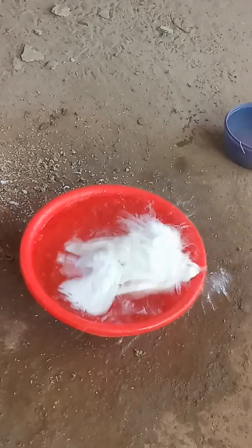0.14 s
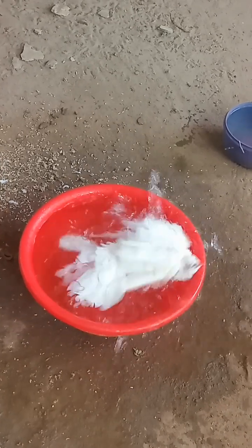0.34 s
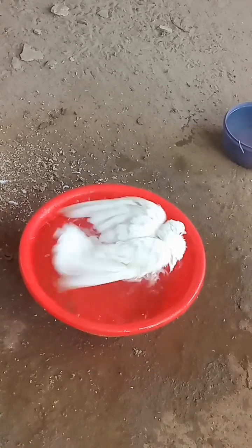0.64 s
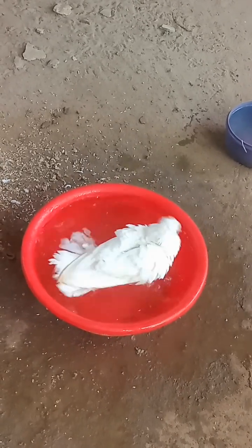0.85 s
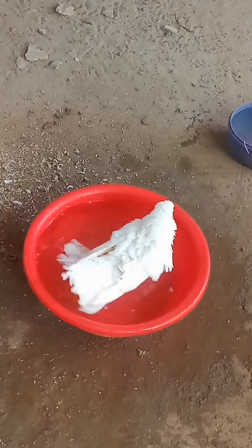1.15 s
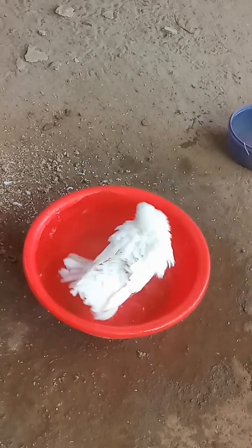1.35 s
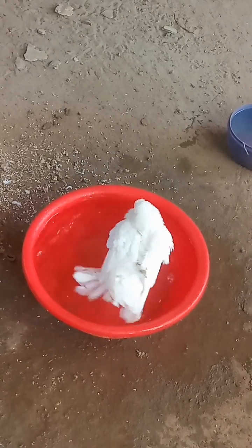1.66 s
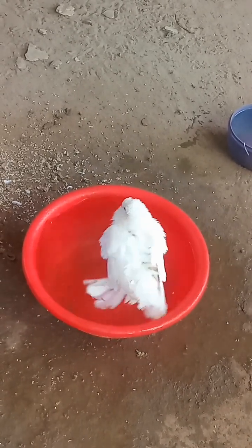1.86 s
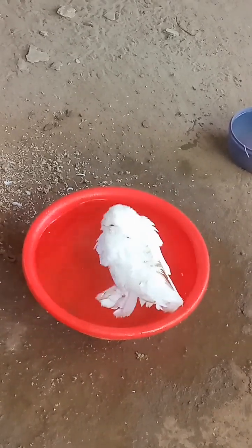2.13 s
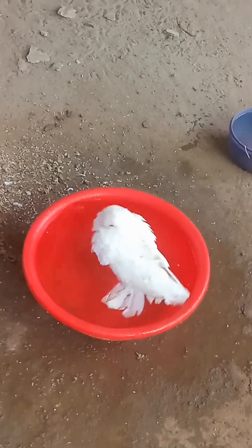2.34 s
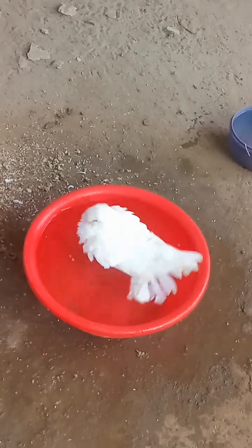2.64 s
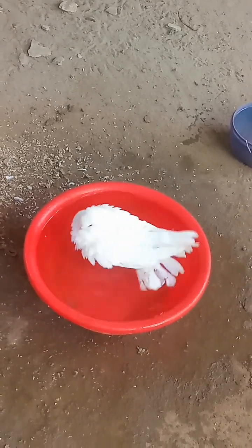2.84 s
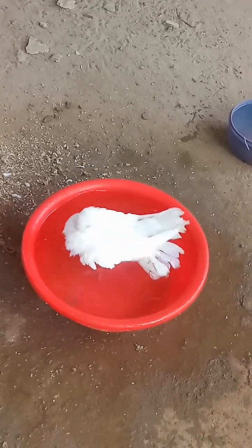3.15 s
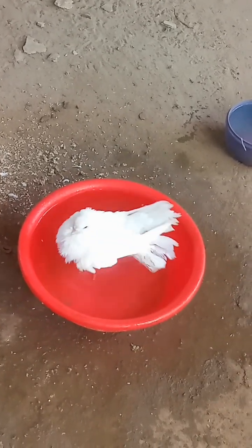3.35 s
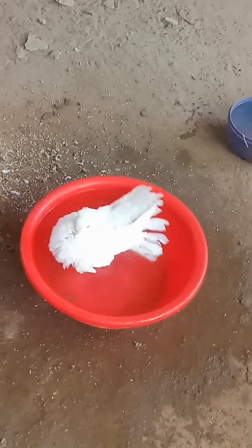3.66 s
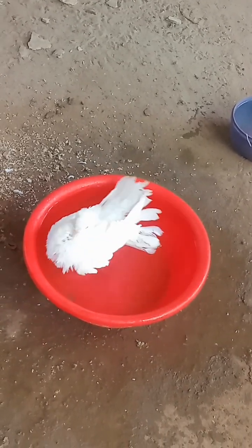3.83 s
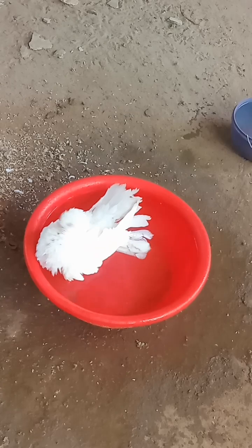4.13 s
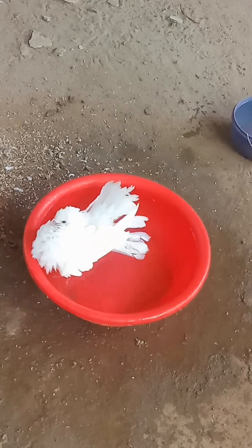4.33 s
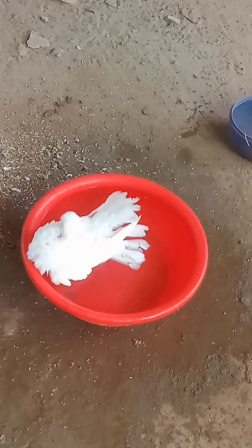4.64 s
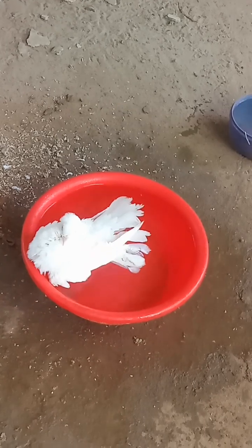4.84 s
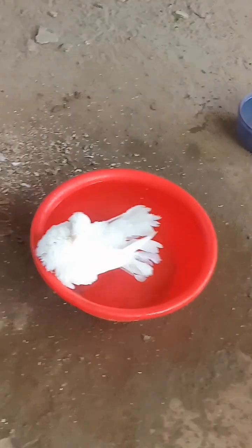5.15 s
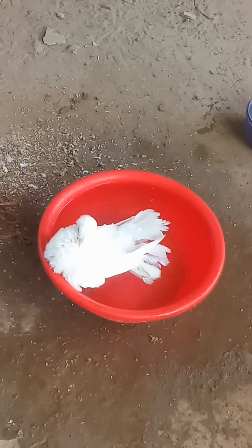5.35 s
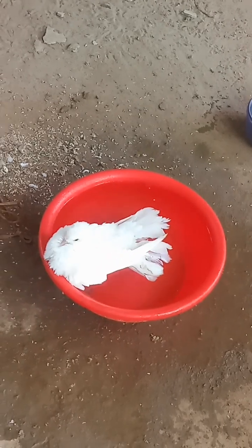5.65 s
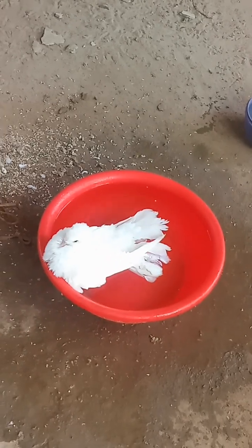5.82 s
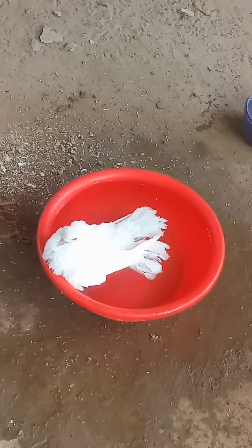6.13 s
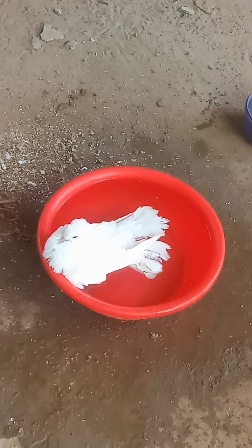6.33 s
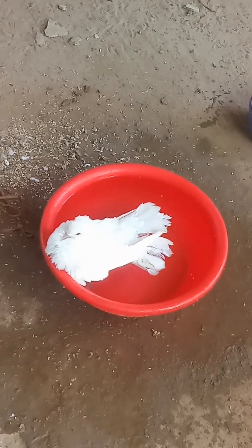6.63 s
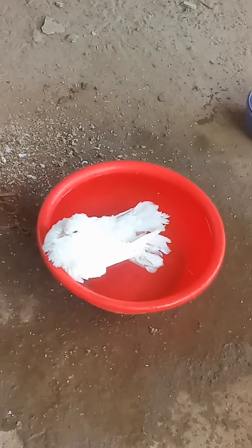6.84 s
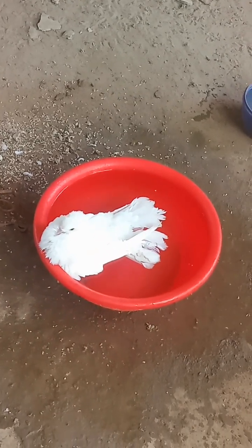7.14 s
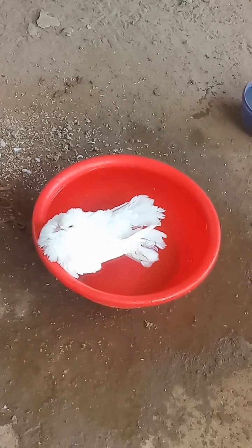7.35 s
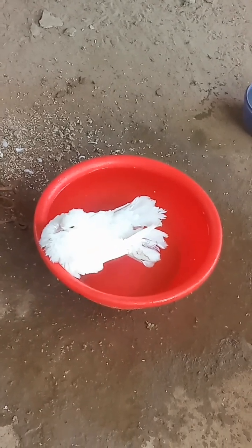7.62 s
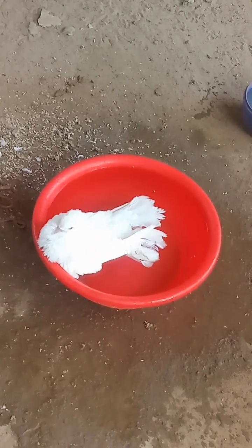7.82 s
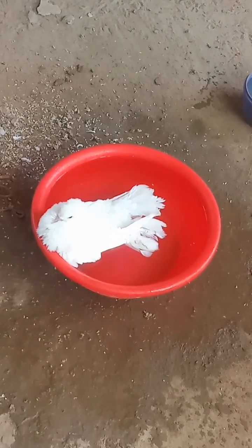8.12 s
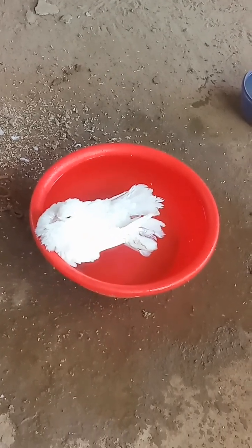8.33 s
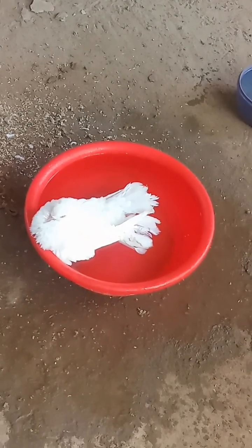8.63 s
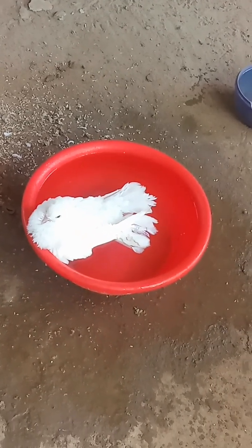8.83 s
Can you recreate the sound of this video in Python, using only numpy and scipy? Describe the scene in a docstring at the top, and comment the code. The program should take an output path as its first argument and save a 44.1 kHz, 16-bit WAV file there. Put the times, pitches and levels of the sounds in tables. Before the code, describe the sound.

A pigeon beats its wings in a shallow plastic basin right away: churning water, hollow plops and hissing spray, then drops pattering on concrete, all over in under a second. Young birds peep throughout in loud, overlapping falling whistles, some hoarse, ringing off the walls. Small feather rustles and dull basin bumps follow. Soft clucks come from further off, and a hoarse rooster crows near seven seconds. Handheld outdoor microphone, the basin close, quiet low background.

```python
"""Young birds peep without pause in falling whistles that ring between the walls of a concrete yard.
At once a pigeon thrashes its wings in a plastic basin: water churns, air pockets plop and spray hisses.
The thrown water patters down for under a second; a few drips, feather rustles and dull bumps follow.
From about the third second a bird clucks softly further off, and near the seventh a rooster crows.
Voices are tones or noise through resonances; water is shaped noise with many tiny ringing bubbles."""
import sys
import numpy as np
from scipy import signal
from scipy.fft import rfft, irfft, next_fast_len
from scipy.io import wavfile
from scipy.ndimage import map_coordinates

SR = 44100
rng = np.random.default_rng(int(sys.argv[2]) if len(sys.argv) > 2 else 0)


def persist_wave(psi):
    """Save psi, clipped to +-1, as 16-bit WAV."""
    counts = np.round(np.clip(psi, -1, 1) * 32767).astype(np.int16)
    wavfile.write(sys.argv[1], SR, np.atleast_2d(counts).T)


N = 396018  # length of the scene in samples, about 9 s


def amp(db):
    """Turn decibels into a gain."""
    return 10 ** (np.asarray(db) / 20)


def unit(x):
    """Scale a sound to an average (rms) level of 1."""
    return x / np.sqrt(np.mean(x ** 2) + 1e-20)


def along(points, hz):
    """Read a curve of (Hz, value) points at any pitch, on a log axis."""
    f, v = np.transpose(points)
    return np.interp(np.log(hz + 1), np.log(f + 1), v)


def gate(t, start, end, fade):
    """One between start and end, with soft edges."""
    inside = np.minimum(t - start, end - t) / fade + .5
    return np.sin(np.pi / 2 * np.clip(inside, 0, 1)) ** 2


def envelope(age, attack_s, hold_s, db_per_s):
    """Rise, hold, then die away at a steady number of decibels a second."""
    return gate(age, 0, np.inf, attack_s) * amp(-db_per_s * np.maximum(age - hold_s, 0))


def wobble(rate, size):
    """A smooth random curve with this many random knots a second."""
    knots = rng.standard_normal(int(size * rate / SR) + 4)
    return map_coordinates(knots, [np.arange(size) * rate / SR])


def filtered(x, response):
    """Multiply the spectrum of x by a function of frequency."""
    m = next_fast_len(len(x) + 8192)  # spare room keeps the end from wrapping onto the start
    return irfft(rfft(x, m) * response(np.fft.rfftfreq(m, 1 / SR)), m)[:len(x)]


def coloured(x, spectrum):
    """Shape x by (Hz, dB) points, at rms 1."""
    return unit(filtered(x, lambda hz: amp(along(spectrum, hz))))


def hump(x, centre_hz, octaves):
    """Pass x through one broad resonance, at rms 1."""
    return unit(filtered(x, lambda hz: np.exp(-.5 * (np.log2((hz + 1) / centre_hz) / octaves) ** 2)))


def grainy(size, clump_db):
    """Noise made of tiny contacts of uneven strength."""
    return rng.standard_normal(size) * amp(clump_db * wobble(700, size))


def add(track, s, sound):
    """Mix a sound into the track at time s, or at the very start if s is negative."""
    i = max(round(s * SR), 0)
    track[i:i + len(sound)] += sound[:max(N - i, 0)]


def bursts(rows, source):
    """Play source(t, ..) for each (start, length, dB, ..) row, unevenly loud; longer ones fade more slowly."""
    out, t = np.zeros(N), np.arange(SR // 2) / SR
    for s, length, db, *rest in rows:
        fade = .008 + 0.2 * length
        swell = gate(t, fade / 2, fade / 2 + length, fade)
        level = amp(db + 1.2 * wobble(55, len(t)))
        add(out, s - fade / 2, swell * level * source(t, *rest))
    return out


def yard(x, walls_db, tail_db):
    """The yard's answer: quick copies from floor and near walls, a few from far walls, then a lumpy tail."""
    # how long the yard rings at each pitch: pitch_hz, time_to_fall_60_db_s
    ring_times = [(300, 0.25), (2700, 0.29), (5000, 0.3), (12000, 0.11)]
    far_wall_db, far_wall_s = -10, .055  # far echoes against near ones, and their middle delay
    hz, t, z = signal.stft(rng.standard_normal(SR * 3 // 4), SR, nperseg=256)
    lumps = amp(3.5 * rng.standard_normal(len(t)))
    decay = amp(-60 * t / along(ring_times, hz)[:, None])
    tail = signal.istft(z * lumps * decay, SR, nperseg=256)[1]
    tail *= 1 - np.exp(-np.arange(len(tail)) / SR / .025)  # the tail builds up gradually

    near, far = np.zeros((2, len(tail)))
    near_delays_s = rng.uniform(.003, .028, size=12)
    near[(near_delays_s * SR).astype(int)] = rng.uniform(0.2, 1, size=12)
    far_delays_s = far_wall_s * rng.uniform(.55, 1.45, size=4)
    far[(far_delays_s * SR).astype(int)] = rng.uniform(.5, 1, size=4)

    paths = [(tail_db, tail), (walls_db, near), (walls_db + far_wall_db, far)]
    answer = sum(amp(db) * path / np.linalg.norm(path) for db, path in paths)
    return signal.fftconvolve(x, answer)[:N]


def air():
    """The quiet outdoor background: soft shaped noise, an uneven low rumble and a faint hum."""
    # colour of the background noise: pitch_hz, relative_level_db
    air_colour = [(15, -37), (25, -17.5), (58, -1.5), (115, -19.5), (185, -4), (290, -13), (700, -18),
                  (1400, -23.5), (2500, -26), (5000, -32.5), (8300, -39), (10600, -30.5), (12500, -41),
                  (15500, -50.5)]
    # faint steady tones: pitch_hz, level_db
    hum_tones = [(880, -86), (1440, -90.5)]
    t = np.arange(N) / SR
    hiss = amp(-73.5 + 0.25 * wobble(4, N)) * coloured(rng.standard_normal(N), air_colour)
    rumble = amp(-81 + 6.1 * wobble(27, N)) * hump(rng.standard_normal(N), 63, octaves=0.74)
    hum = sum(amp(db) * np.sin(2 * np.pi * hz * t + 0.38 * wobble(14, N)) for hz, db in hum_tones)
    return hiss + rumble + hum


def clucks():
    """Soft clucks: short tones whose phase wanders at random, which roughens them."""
    # start_s, length_s, relative_level_db, pitch_hz
    cluck_rows = [(2.8, 0.05, -79, 703), (4.18, 0.1, -77, 410), (4.46, .046, -74.5, 415),
                  (4.63, 0.064, -75, 419), (4.93, 0.056, -81, 396), (5.05, .065, -72.5, 404),
                  (5.52, 0.032, -67, 389), (5.58, 0.1, -73.5, 486), (6.33, 0.066, -79, 383),
                  (6.41, 0.086, -81.5, 624), (6.52, 0.2, -78.5, 810), (8.1, 0.21, -78.5, 717)]
    return bursts(cluck_rows, lambda t, hz: unit(np.sin(2 * np.pi * hz * t + 2.37 * wobble(60, len(t)))))


def crow():
    """A rooster's hoarse crow: five harmonics and noise heard through two throat resonances."""
    # syllables: start_s, hold_s, pitch_hz, upper_resonance_relative_db, lower_resonance_relative_db
    syllables = [(6.955, 0.12, 627.5, -72.5, -73), (7.237, 0.31, 570, -81.5, -69),
                 (7.444, 0.19, 559, -74.5, -69.5), (7.986, 0.29, 530.5, -77.5, -76)]
    # each syllable swells, dies away and sags in pitch
    attack_s, fade_db_per_s, sag_hz_per_s = 0.041, 96, 60
    out, age = np.zeros(N), np.arange(SR) / SR - attack_s
    for s, hold_s, hz, upper_db, lower_db in syllables:
        pitch = (hz - sag_hz_per_s * age) * (1 + 0.0261 * wobble(148.6, SR))
        phase = 2 * np.pi * np.cumsum(pitch) / SR
        voice = sum(np.sin(k * phase) for k in range(1, 6)) + 5 * rng.standard_normal(SR)
        throat = amp(upper_db + 4.0) * hump(voice, 1950, octaves=0.14)
        throat += amp(lower_db - 9.0) * hump(voice, 1015, octaves=0.3)
        add(out, s + age[0], throat * envelope(age, attack_s, hold_s, fade_db_per_s))
    return out


def peep_pitch(age, length, top_hz, end_hz, bend, moment, share):
    """Scoop up to the top, then sag to the end, with one quicker drop where the voice breaks."""
    scoop_share, scoop_s = .146, .008  # starts about this share too low and slides up this quickly
    break_s = .011  # quickness of the drop
    u = np.clip(age / length, 0, 1)
    drop = np.tanh((u - moment) * length / break_s)
    drop = (drop - drop[0]) / (drop[-1] - drop[0])
    fall = (1 - share) * u ** bend + share * drop
    scoop = np.exp(-np.maximum(age, 0) / scoop_s) * (scoop_share + .04 * wobble(900, len(age)))
    return (top_hz + (end_hz - top_hz) * fall) * (1 - scoop)


def peep(age, length, top_hz, end_hz, bend, moment, share, db, swell_db, second_db, octave_db):
    """One falling whistle from a two-part voice box and, separately, its overtones."""
    # resonances of throat and beak: pitch_hz, gain_db
    beak_gain = [(2350, 2), (2850, 0.5), (3250, -0.5), (3850, 1.5), (4400, -2), (5000, 0), (5800, 5)]
    # strength of an overtone where it falls: pitch_hz, relative_level_db
    overtone_gain = [(4800, -38), (5700, -21.5), (6700, -17), (7400, -35.5), (8300, -39.5), (9200, -42.5),
                     (12000, -50)]
    all_peeps_db, arch_db = -1.07, 5  # shift of every peep; its middle over its ends
    accent_db, accent_s = 0.5, 0.023  # the voice flares as it breaks
    second_ratio, second_lag = 1.107, .19  # the second voice lies higher and sinks more slowly

    size, u = len(age), np.clip(age / length, 0, 1)
    hz = peep_pitch(age, length, top_hz, end_hz, bend, moment, share)
    hz = hz * (1 + .009 * wobble(260.84, size) + .008 * wobble(50, size))
    phase = 2 * np.pi * np.cumsum(hz) / SR

    effort_db = all_peeps_db + db + swell_db * (u - .5) - arch_db * (2 * u - 1) ** 2
    effort_db += accent_db * np.exp(-((age - moment * length) / accent_s) ** 2)
    loudness_db = effort_db + along(beak_gain, hz) + 2.73 * wobble(109.9, size)
    level = np.sqrt(2) * amp(loudness_db) * gate(age, 0, length, 0.021)

    # the other half of the voice box joins a little later with a higher, rougher tone
    tension = np.clip((hz - 2700) / 1000, 0, 1) * gate(age, 0.026, length, 0.053)
    second_hz = second_ratio * hz * (top_hz / hz) ** second_lag
    second_phase = 2 * np.pi * np.cumsum(second_hz) / SR + .9 * wobble(330, size)
    second = amp(second_db) * tension * np.sin(second_phase)

    octave_level_db = octave_db - 3.0 + along(overtone_gain, 2 * hz) + 3 * wobble(60, size)
    octave = amp(octave_level_db) * np.sin(2 * phase)
    # the two voices mix into a sum tone just above the octave
    mixed_level = amp(second_db - 1.0 + along(overtone_gain, hz + second_hz)) * tension
    mixed = mixed_level * np.sin(phase + second_phase)
    return level * (np.sin(phase) + second), level * (octave + mixed)


def rasp(t, centre_hz):
    """A toneless chirp: turbulent air through the throat's resonances."""
    # multiple_of_centre, relative_level_db, width_octaves
    throat_bands = [(.49, -23, 0.19), (1, 2, 0.22), (1.52, -21.5, 0.11), (2.05, -27.5, 0.32)]
    return sum(amp(db - 1.0) * hump(grainy(len(t), clump_db=3.0), ratio * centre_hz, width)
               for ratio, db, width in throat_bands)


def chicks():
    """Young birds peep over each other, now and then hoarsely; each peep has its own reflections."""
    # peeps: start_s, length_s, top_hz, end_hz, bend of the sag (1 = straight, more = holds the top longer),
    # moment of the voice's break (0-1), share of the fall made in that break (0-1),
    # relative_level_db, swell from start to end_db, second_voice_db, octave_relative_db
    peep_rows = [(0.09, 0.18, 4860, 2550, 0.74, 0.48, 0.28, -43.0, 8.5, -14, 0),
                 (0.221, 0.27, 5306, 2306, 1.58, 0.27, 0.18, -46, 10, -4, -20),
                 (0.933, 0.19, 4580, 2680, 0.58, 0.47, 0.48, -46.5, 16, -10, 0),
                 (0.939, 0.34, 5420, 2180, 1.01, 0.72, 0.097, -47.5, -8, -17, -5),
                 (1.561, 0.24, 5260, 2696, 0.79, 0.47, 0.17, -44, 6, -9, 5),
                 (1.931, 0.21, 4704, 2406, 0.88, 0.23, 0.19, -50.5, -3, -12, -4),
                 (1.961, 0.17, 4734, 2712, 1.43, 0.49, 0.28, -42, 17.5, -19.5, 0.5),
                 (2.14, 0.3, 5630, 2370, 1.77, 0.41, 0.088, -48.5, 12.5, -15, 3),
                 (2.582, 0.25, 4933, 2640, 0.71, 0.51, 0.34, -43, 11.5, -5.5, -1.5),
                 (2.845, 0.18, 5760, 4220, 1.6, 0.57, 0.17, -54.5, 10, -15, 8),
                 (2.961, 0.2, 4613, 2390, 0.99, 0.66, 0.31, -38, 6.5, -12, -8.5),
                 (2.975, 0.094, 3970, 2860, 0.5, 0.74, 0.32, -49.5, -11, -4, -15),
                 (3.422, 0.19, 4743, 2360, 2.3, 0.46, 0.24, -40.5, 20, -9.5, -10.5),
                 (3.622, 0.15, 5260, 2460, 2, 0.72, 0.1, -53.5, -5.5, -8.5, 3),
                 (3.826, 0.19, 4300, 2327, 0.89, 0.69, 0.3, -52, 2.5, -7, -4),
                 (3.871, 0.22, 5444, 2533, 0.71, 0.72, 0.21, -38.2, 9, -20.5, 2.5),
                 (4.183, 0.37, 5040, 2538, 1.12, 0.89, 0.26, -50, -3.5, -10.5, -10),
                 (4.63, 0.21, 4914, 2424, 1.46, 0.4, 0.2, -44.5, 14, -23, -23),
                 (4.736, 0.3, 4940, 2510, 2.42, 0.79, 0.18, -52, 8.5, -10, 1),
                 (5.29, 0.23, 5167, 2503, 1.85, 0.96, 0.22, -50.5, 9, -8, 6),
                 (5.52, 0.14, 4310, 2424, 0.87, 0.65, 0.17, -59, 2, -22, -2),
                 (5.54, 0.23, 4790, 2611, 0.73, 0.52, 0.36, -48.0, 16, -15.5, -15.5),
                 (5.865, 0.241, 5023, 2500, 1.95, 0.85, 0.1, -48.5, 3, -11, 5),
                 (5.882, 0.12, 3920, 3200, 3.8, 0.453, 0.29, -62, 7, -9, -12),
                 (6.115, 0.19, 4780, 2585, 1.0, 0.32, 0.34, -54.5, -11, -17, -6),
                 (6.344, 0.13, 4930, 2852, 0.68, 0.41, 0.13, -56.5, 3.5, -20, -2),
                 (6.526, 0.23, 5134, 2690, 1.26, 0.96, 0.16, -56, 1, -10, -9),
                 (6.786, 0.14, 4340, 2350, 2.9, 0.5, 0.47, -47, 12, -13, -1.5),
                 (7.046, 0.24, 5210, 2236, 1.1, 0.67, 0.15, -53.5, -13, -6.5, 3),
                 (7.557, 0.186, 4455, 2386, 1.17, 0.57, 0.28, -55, 2, -4, -8),
                 (7.607, 0.27, 5180, 2410, 2.45, 0.44, 0.11, -59, 14.5, -6.5, -4),
                 (7.907, 0.12, 5157, 3450, 2, 0.57, 0.088, -57.5, -1, -22, -10),
                 (8.031, 0.23, 4654, 2600, 1.03, 0.8, 0.06, -60.5, 9, -5, -9),
                 (8.085, 0.19, 5104, 2195, 2.42, 0.7, 0.1, -56.5, 1, -10.5, 7),
                 (8.211, 0.206, 4280, 2380, 1.4, 0.66, 0.37, -58, 2, -9, 0),
                 (8.556, 0.24, 5020, 2595, 2.4, 0.78, 0.1, -52.5, 9.5, -2.5, 4),
                 (8.885, 0.11, 4570, 3950, 3.1, 0.47, 0.36, -54, 29, -24, -12)]
    # hoarse chirps: start_s, length_s, relative_level_db, centre_hz
    rasp_rows = [(.31, 0.2, -50.5, 4600), (1.07, 0.16, -56.5, 3860), (1.258, 0.049, -62, 1850),
                 (2.855, 0.35, -54.5, 4080), (3.46, 0.092, -54, 3950), (3.73, .12, -59, 3360),
                 (4.285, 0.152, -51.5, 4040), (5.81, 0.13, -56.5, 4130), (8.415, 0.17, -60.5, 4210)]
    out, age = np.zeros(N), np.arange(SR // 2) / SR - .01
    for s, *shape in peep_rows:
        whistle, overtones = peep(age, *shape)
        # overtones are beamed away from the listener and arrive mostly off the walls
        add(out, s + age[0], amp(-0.86) * whistle + amp(-11.0) * overtones)
        add(out, s + age[0], yard(whistle, walls_db=-2.5, tail_db=-6.0))
        add(out, s + age[0], yard(overtones, walls_db=3.5, tail_db=-4.5))
    hoarse = bursts(rasp_rows, rasp)
    return out + hoarse + yard(hoarse, walls_db=-4.0, tail_db=-15.5)


def tick(db):
    """A drop landing on the concrete: high noise that falls 60 dB in 22 ms."""
    t = np.arange(SR // 20) / SR
    return amp(db - 60 * t / .022) * hump(rng.standard_normal(len(t)), 11000, octaves=0.43)


def settling():
    """Drops tick, short bright noises rustle or top a hoarse chirp, the body scuffs and bumps the basin."""
    # short bright noise bursts, feather rustles and the high part of hoarse chirps:
    # start_s, length_s, level_db, centre_hz
    bright_rows = [(.575, 0.046, -70.5, 5700), (3.135, 0.022, -61, 8770), (3.21, 0.032, -66.5, 10900),
                   (3.27, 0.03, -58, 6100), (3.435, 0.035, -65, 8100), (3.73, 0.038, -69, 6350),
                   (5.81, 0.12, -83.5, 11200), (5.88, 0.076, -70, 6000), (6.225, 0.02, -62, 5200)]
    # the body scuffing against the basin: start_s, length_s, level_db
    scuff_rows = [(5.805, 0.095, -56.5), (6.085, 0.048, -63), (6.22, 0.031, -68.5)]
    # how the plastic basin colours a scuff: pitch_hz, relative_level_db
    basin_colour = [(71, -34), (120, -9.5), (353, 1.5), (442, -12), (533, -4.5), (660, -19), (961, -9.5),
                    (1630, -14), (1870, -11), (2400, -4.5), (3120, -5), (5280, -120)]
    # dull bumps of the basin on the floor: start_s, length_s, level_db, centre_hz
    bump_rows = [(.39, 0.086, -58.5, 56), (1.25, 0.071, -67, 54.6), (5.08, 0.027, -59.5, 81.3),
                 (5.55, 0.16, -72, 202), (6.2, 0.18, -73, 320), (6.42, 0.21, -70, 179),
                 (8.05, 0.2, -79, 340)]
    # drops landing on the concrete: start_s, starting_level_db
    drip_rows = [(.029, -46), (0.1, -37), (.322, -57.5), (.331, -55.5), (.349, -56.5), (.455, -58.5),
                 (.573, -74), (1.06, -74), (3.438, -73), (3.866, -69), (6.229, -68)]
    out = bursts(bright_rows, lambda t, hz: hump(grainy(len(t), clump_db=4), hz, octaves=0.21))
    out += bursts(scuff_rows, lambda t: coloured(grainy(len(t), clump_db=0.5), basin_colour))
    out += bursts(bump_rows, lambda t, hz: hump(rng.standard_normal(len(t)), hz, octaves=0.39))
    for s, db in drip_rows:
        add(out, s, tick(db))
    return out


def droplets(count, centre_hz, cycles):
    """Tiny bubbles of scattered pitch and size that ring for a few cycles during the splash."""
    out, life = np.zeros(N), np.arange(SR // 50) / SR
    for when, pitch, size in rng.uniform(size=(count, 3)):
        turns = life * centre_hz * 3 ** (2 * pitch - 1)  # from a third to three times the centre
        ring = np.sin(2 * np.pi * turns) * np.exp(-turns / cycles) * (1 - np.exp(-turns))
        add(out, when * 0.4, amp(-20 * size) * ring)
    return out / np.std(out[:SR // 2])  # rms 1 over the first half second


def plops():
    """Air pockets close under the wing; each bubble's pitch rises a little as it nears the surface."""
    # start_s, pitch_hz, relative_level_db, time_to_fall_60_db_s
    plop_rows = [(0.025, 1015, -39.5, 0.031), (0.0587, 1138, -29, 0.062), (0.1, 1052, -43.5, 0.076),
                 (0.116, 1186, -43.5, 0.059), (0.189, 1690, -39.5, 0.036)]
    out, life = np.zeros(N), np.arange(SR // 8) / SR
    for s, hz, db, t60 in plop_rows:
        ring = np.sin(2 * np.pi * hz * life * (1 + 0.06 * life)) * (1 - np.exp(-life / 0.0013))
        add(out, s, amp(db + 3 - 60 * life / t60) * ring)
    return out


def patter():
    """Thrown water lands on the concrete in scattered drops that come a little thicker but softer."""
    start_s, end_s = .08, .72
    first_db, fade_db_per_s = -52.5, 45.5  # the loudest first drops, and how fast later ones soften
    out = np.zeros(N)
    for when, size in rng.uniform(size=(50, 2)):
        late = when ** 0.71 * (end_s - start_s)
        add(out, start_s + late, tick(first_db - fade_db_per_s * late - 14 * size))
    return out


def bath():
    """Wing beats churn the water, trap air pockets and throw spray, which patters back down."""
    # wing beats in the water: start_s, slosh_relative_db, spray_relative_db
    beats = [(0.0, -42.5, -54.5), (0.096, -45.5, -49), (.166, -58.5, -56), (.205, -51.5, -54.5)]
    # colour of churned water: pitch_hz, relative_level_db
    slosh_colour = [(300, -73.5), (600, -26.5), (780, -16.5), (950, -5), (1140, -5), (1410, -4), (1900, -3),
                    (2600, -6), (3400, -19), (5700, -100)]
    # colour of thrown spray: pitch_hz, relative_level_db
    spray_colour = [(500, -52), (1200, -21.5), (2200, 12.5), (4000, 9.5), (6500, 2.5), (8500, -4),
                    (10500, 2), (13000, -11), (16000, -11)]
    attack_s, hold_s = .006, .018  # the wing strikes, then drags through the water
    slosh_db_per_s, spray_db_per_s = 125, 217.5  # how fast each dies after a beat
    t = np.arange(N) / SR
    # where beats overlap, the stronger one counts
    slosh = np.max([amp(db) * envelope(t - s, attack_s, hold_s, slosh_db_per_s)
                    for s, db, _ in beats], axis=0)
    spray = np.max([amp(db) * envelope(t - s, attack_s, hold_s, spray_db_per_s)
                    for s, _, db in beats], axis=0)
    water = amp(-6.0) * slosh * coloured(grainy(N, clump_db=2.0), slosh_colour)
    water += spray * amp(6.0 + 1.0 * wobble(70, N)) * coloured(grainy(N, clump_db=4.5), spray_colour)
    water += spray * amp(-4.0) * droplets(count=420, centre_hz=4180, cycles=6)
    return water + patter() + plops()


def scene():
    """Birds out in the yard, the basin close by."""
    far = clucks() + crow()
    basin = bath() + settling()
    far = amp(3) * far + yard(far, walls_db=-5.5, tail_db=-2.5)
    basin = basin + yard(basin, walls_db=-8.5, tail_db=-8)
    return (air() + far + chicks() + basin)[None]


def record(dry):
    """Nothing is kept above the band limit of 15730 Hz."""
    return filtered(dry[0], lambda hz: hz < 15730)[None]


dry = scene()
out = record(dry)
persist_wave(out)
```